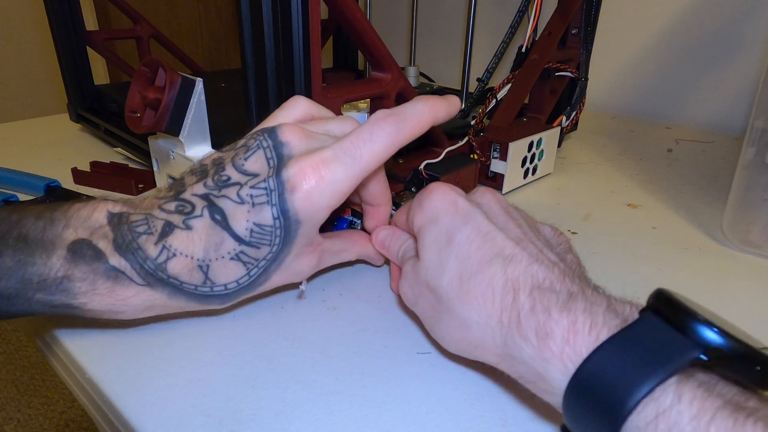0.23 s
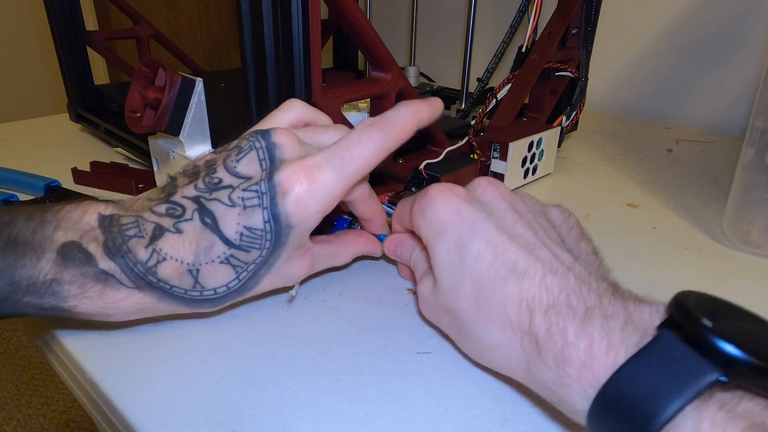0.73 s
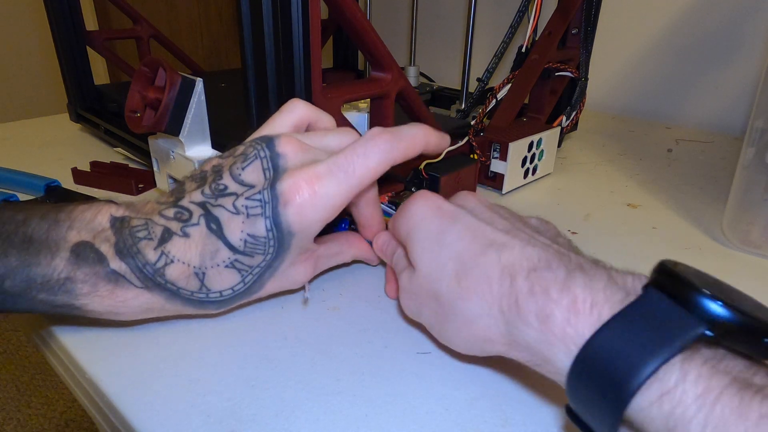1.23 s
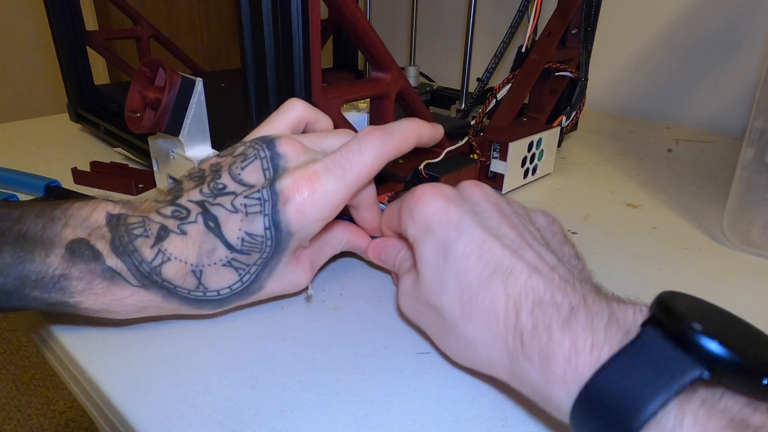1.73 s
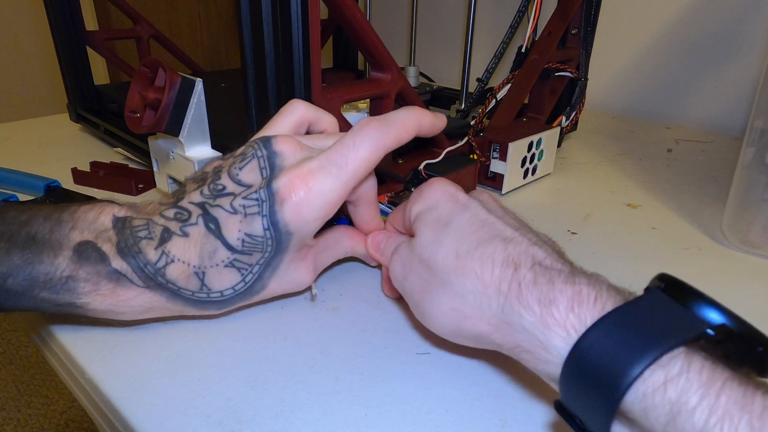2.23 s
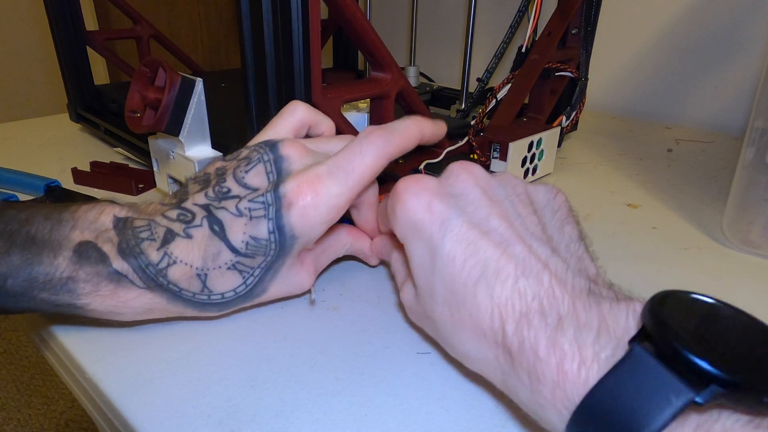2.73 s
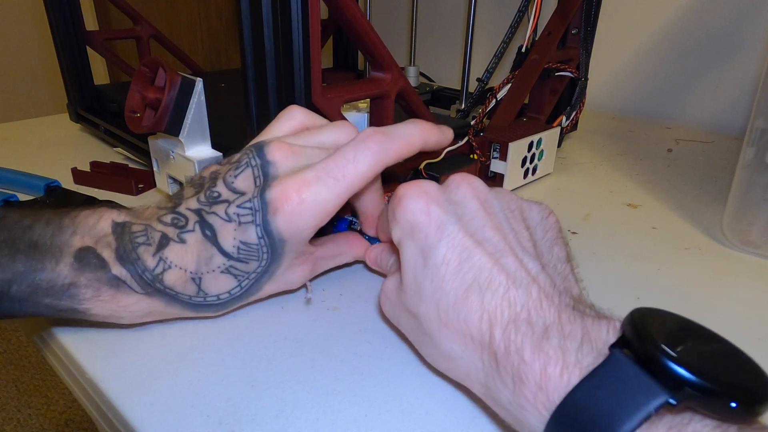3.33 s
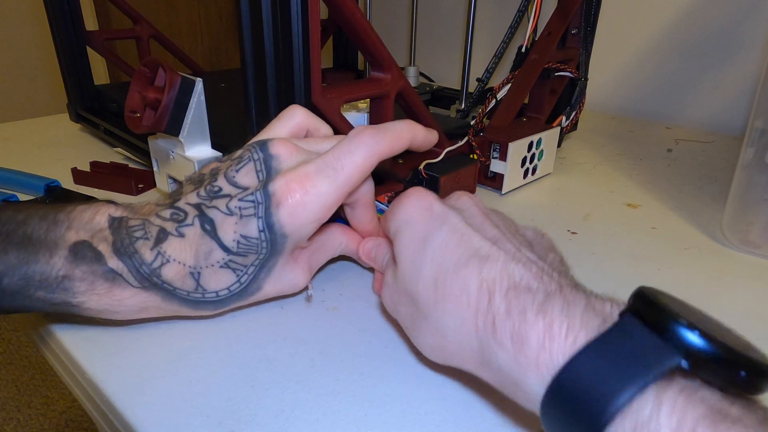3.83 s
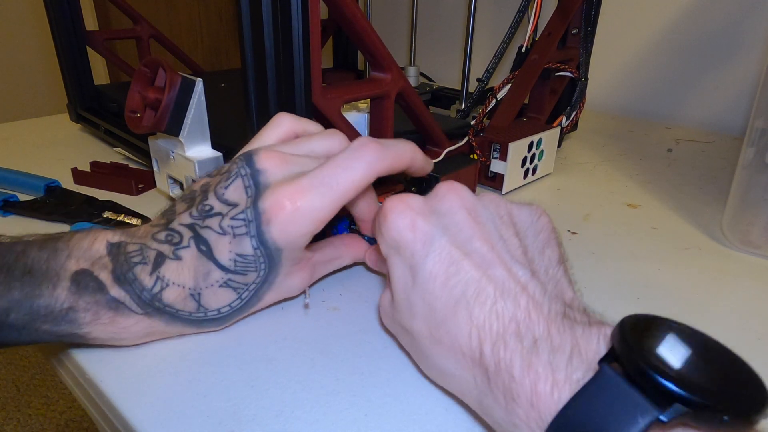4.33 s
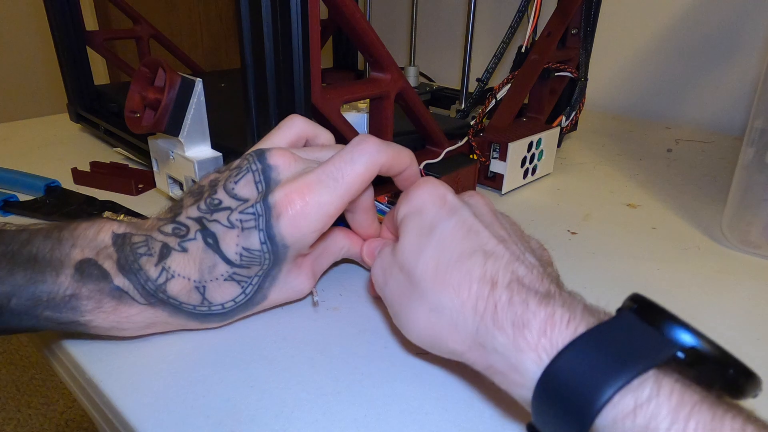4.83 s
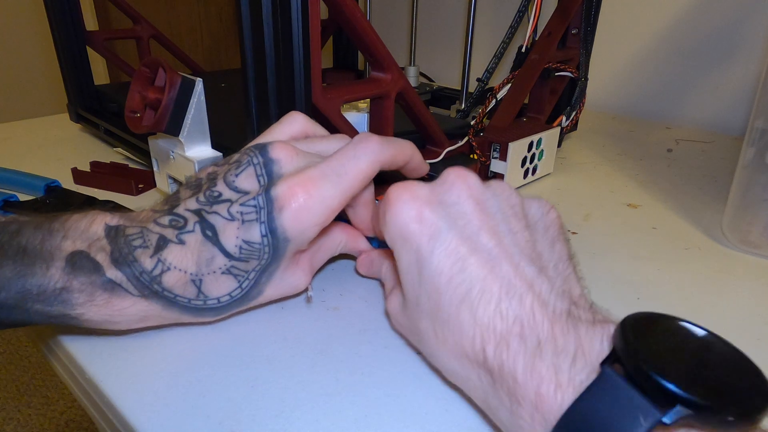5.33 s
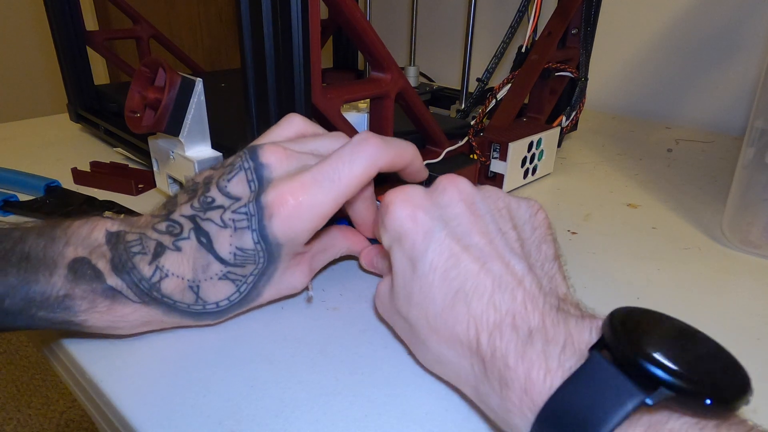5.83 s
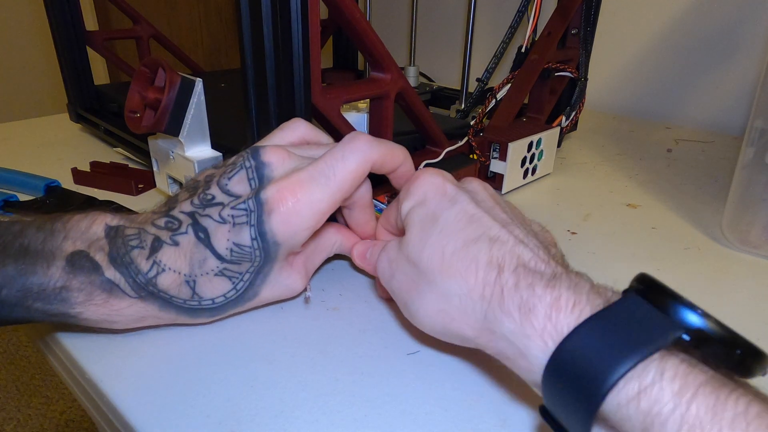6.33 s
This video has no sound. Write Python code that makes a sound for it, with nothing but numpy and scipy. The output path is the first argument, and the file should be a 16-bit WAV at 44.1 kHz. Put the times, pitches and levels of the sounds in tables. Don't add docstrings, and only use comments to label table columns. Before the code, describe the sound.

Two hands work a small plastic part and wires on a bench in a small hard room. Low knocks and dragging rumbles come through the microphone's stand, with grainy rustle and dry plastic ticks. A loud snap comes early, an even louder one near the middle, then quieter fiddling and soft bumps over faint hum and hiss.

```python
import sys
import numpy as np
from scipy import signal
from scipy.fft import rfft, irfft, next_fast_len
from scipy.io import wavfile
from scipy.ndimage import map_coordinates

SR = 44100
rng = np.random.default_rng(int(sys.argv[2]) if len(sys.argv) > 2 else 0)


def wrap_up_sound(samples):
    columns = np.atleast_2d(samples).T
    tamed = np.clip(columns, -1, 1)
    steps = np.round(tamed * 32767).astype(np.int16)
    wavfile.write(sys.argv[1], SR, steps)


def decibels_to_gain(level_db):
    exponent = np.asarray(level_db, float) / 20
    return 10 ** exponent


N = 289957


def board():
    # peak_s, level_db, rise_s, fall_s, hardness_db
    drags = [(.144, -42, 0.07, 0.033, 13.5), (.224, -42, 0.16, 0.093, 6), (.454, -42.5, 0.1, 0.34, -5),
             (.968, -35, 0.21, 0.11, -9.5), (1.114, -45.5, 0.053, 0.11, -6), (1.262, -51, .4, .05, -24),
             (1.456, -41.5, 0.24, 0.038, 2), (1.996, -31, 0.19, 0.033, -9), (2.034, -42, .2, 0.14, -16),
             (3.56, -44, 0.1, 0.32, -2.5), (3.714, -36.5, 0.24, 0.11, -9), (3.962, -50.5, 0.11, 0.17, 4.5),
             (4.022, -41.5, 0.3, .1, -21), (4.78, -33, 0.26, 0.15, -10), (5.228, -39.5, 0.067, 0.1, 5),
             (5.91, -35, 0.076, 0.13, -12.5), (6.108, -39, 0.21, 0.17, -6.5),
             (6.418, -44.5, 0.9, 0.095, -13.5), (1.79, -45, 0.046, 0.87, -21),
             (2.522, -40, 0.019, .125, -3), (3.068, -43.5, 0.038, 0.054, -24),
             (4.408, -56.5, 0.041, 0.37, -25), (5.322, -57.5, 0.053, 0.13, -17),
             (5.51, -37.5, .04, 0.11, -6.5)]
    # start_s, level_db, fall_s, hardness_db
    landings = [(1.291, -37, 0.22, -4), (2.287, -40, .11, -37), (2.485, -49.5, 0.093, -15),
                (2.874, -49.5, 0.15, 13.5), (3.211, -55, 0.62, -8.5), (3.48, -48.5, 0.36, -21),
                (4.905, -50.5, 0.038, -25), (5.06, -63.5, 0.064, -30), (5.138, -43, 0.45, -1.5),
                (5.761, -45, 0.075, -24), (5.821, -45.5, .5, -30)]
    # start_s, peak_db, hardness_db
    knocks = [(0.144, -19, -14), (0.377, -33, -24), (0.947, -19, -9.5), (0.974, -23, 6.5),
              (1.101, -25.5, -7.5), (1.284, -14, -9), (1.383, -28, -12), (1.962, -20, -21.5),
              (2.281, -23, -38), (2.485, -37, -16.5), (2.523, -28.5, -9), (3.053, -60, -34.5),
              (3.474, -35, -36), (3.634, -41, -19.5), (3.699, -27, -16), (3.878, -35.5, -11),
              (3.947, -26, -2), (3.994, -26.5, -10), (4.459, -34.5, -47), (4.744, -29, -25.5),
              (4.799, -53, -27), (5.047, -41.5, -34.5), (5.134, -23, -21), (5.318, -26.5, -30),
              (5.502, -32, -1.5), (5.76, -37, -26), (5.819, -25.5, -36.5), (6.087, -47, -31),
              (6.094, -19.5, -37), (6.351, -42.5, -17.5)]
    # pitch_hz, width_hz, level_db
    low_modes = [(182, 24, -3), (233, 35, -5), (287, 23.8, 1), (366.5, 40, -5.5), (427.5, 55, -10)]
    # pitch_hz, width_hz, level_db
    high_modes = [(498, 170, -1), (647, 44, 3), (647, 76, -4.5), (789, 79, 3), (960, 400, -6.5)]
    # pitch_hz, width_hz, level_db
    leg_modes = [(60, 29, -1.5), (101.1, 54, 3)]

    level, firm = strokes(drags, landings, attack_s=0.0032)
    push = decibels_to_gain(1.9 * wobble(30)) * slips(rate=250, spread_db=2.93, smooth=0.96)
    heavy = decibels_to_gain(-15.5) * level * (level / level.max()) ** 0.43
    drag = level * unit(body(push, low_modes))
    drag += heavy * unit(body(push, leg_modes))
    drag += firm * decibels_to_gain(-2.5) * unit(body(push, high_modes))

    soft, hard = np.zeros((2, N))
    for start_s, peak_db, hard_db in knocks:
        i = round(start_s * SR)
        soft[i] = -decibels_to_gain(peak_db + 35)
        hard[i] = -decibels_to_gain(peak_db + hard_db + 28.5)

    def stand(f):
        return (1j * f / (60 + 1j * f)) ** 2 / (1 + 1j * f / 1300) ** 2

    return filtered(decibels_to_gain(-2.5) * drag + body(soft, low_modes) + body(hard, high_modes), stand)


def plastic_contacts():
    # start_s, peak_db, ring_hz, edge_db
    taps = [(0.0667, -52, 1950, 24), (0.1052, -25.5, 1900, -17), (0.8506, -42.5, 1620, -24.5),
            (0.9104, -42.5, 2250, -14.5), (0.9465, -30.5, 1754, -11), (0.9586, -34, 2940, -17),
            (0.9746, -24.5, 1850, -14), (1.1038, -44, 1440, -8), (2.4857, -56.5, 3620, -6.5),
            (3.7956, -47, 1560, -30), (5.137, -39.5, 1400, -24)]
    # start_s, peak_db, ring_hz, edge_db
    held_ticks = [(0.481, -25, 3800, -39), (0.552, -29, 1830, -6), (1.171, -43.5, 1720, -17),
                  (1.19, -52, 1800, -19), (1.2311, -46.5, 3340, -15), (1.408, -45, 3450, -13),
                  (4.745, -48, 1184, -27), (6.088, -47, 1500, -3.5), (1.9418, -32.5, 2370, -37),
                  (2.285, -37, 3250, -14), (3.1652, -38, 1846, -51), (3.223, -36, 3380, -33),
                  (3.999, -32.5, 1800, -10), (4.287, -36, 1870, -16), (5.2819, -33.5, 1790, -15),
                  (5.5068, -32.5, 2920, -23), (5.638, -36.5, 2800, -23.5), (5.768, -50.5, 1640, -24)]
    # start_s, peak_db, ring_hz, edge_db, thud_db
    snaps = [
        (0.1255, -19.5, 1930, -11, -12),
        (0.1436, -15.5, 1900, -18, -11.5),
        (.4990, -18, 2300, -28, -20),
        (0.5244, -3.5, 2117, -10.5, -25.5),
        (1.2853, -28, 3470, -10.5, -16),
        (2.8678, 1, 2440, -8.5, -35.5),
    ]
    # pitch_hz, width_hz, level_db
    deep_modes = [(778, 170, -5), (1150, 360, 4.5)]
    # pitch_hz, width_hz, level_db
    low_modes = [(1560, 60, -0.5), (1800, 120, -1), (2276, 230, -5), (3050, 460, -6.5)]
    # pitch_hz, width_hz, level_db
    high_modes = [(4020, 610, -0.5), (4600, 160, -2.5), (5240, 520, -5.5)]
    # pitch_hz, width_hz, level_db
    tab_modes = [(6500, 780, -10.5), (7740, 690, -9.5), (9800, 1200, -8.5), (12800, 940, -10)]
    pulse, lead, knots = 4096, 48, 40

    out = np.zeros(N + SR)
    f = np.fft.rfftfreq(pulse, 1 / SR)
    small = 1 / (1 + (1400 / (f + 1)) ** 8)
    blunt = 1 / (1 + (f / 3300) ** 5)
    thud_range = 1 / (1 + (f / 1500) ** 4) / (1 + (600 / (f + 1)) ** 4)

    def ring(modes):
        return sum(decibels_to_gain(db + rng.normal(0, 0.5)) ** 2 / (1 + (2 * (f - hz) / width) ** 2)
                   for hz, width, db in modes)

    contacts = [(*row, -6.5) for row in taps] + [(*row, -25) for row in held_ticks] + snaps
    for start_s, peak_db, ring_hz, edge_db, thud_db in contacts:
        tone = blunt * ring(low_modes)
        tone += ring([(ring_hz, 350, -1.5)]) / (1 + ((f - ring_hz) / 900) ** 4)
        edge = decibels_to_gain(edge_db + 3.0) ** 2 * ring(high_modes) / (1 + (f / 6000) ** 8)
        tabs = decibels_to_gain(edge_db - 16.5 + 4.5) ** 2 * ring(tab_modes)
        overtone = decibels_to_gain(edge_db + 3) ** 2 / (1 + ((f - 2.03 * ring_hz) / 350) ** 4)
        overtone = overtone / (1 + (f / 5600) ** 16)
        thud = decibels_to_gain(thud_db + 7) ** 2 * ring(deep_modes) * thud_range
        knot_hz = np.arange(knots) * SR / 2 / knots
        late_s = 0.0045 * np.interp(f, knot_hz, rng.random(knots) ** 2) + lead / SR
        hit = causal(small * (tone + edge + tabs + overtone) + thud, late_s)
        hit = hit[:pulse // 2] / np.linalg.norm(hit)
        out[round(start_s * SR) - lead:][:len(hit)] += decibels_to_gain(peak_db + 11.5) * hit
    return out[:N]


def rustle():
    # peak_s, level_db, rise_s, fall_s, case_share_db
    rubs = [(.095, -64, .4, .02, -5), (.128, -43, 0.022, 0.028, 1), (.206, -59, .3, .09, -1),
            (.49, -42.5, 0.066, .01, -0.5), (.852, -49.5, 0.067, 0.14, -12), (.945, -51, 0.094, .01, -5),
            (1.419, -44.5, 0.048, 0.083, 3.5), (1.773, -58.5, .05, 0.19, -2.5),
            (1.945, -53, 0.11, 0.22, 1.5), (2.538, -50, 0.042, 0.15, 3), (3.578, -52, 0.12, 0.072, -4),
            (3.65, -54, 0.046, 0.25, -0.5), (3.986, -43.5, 0.089, 0.055, 1), (4.81, -57, 0.53, 0.14, -2),
            (5.2, -50.5, 0.083, 0.18, 0), (5.514, -55, 0.056, 0.062, -7.5), (5.65, -55.5, 0.13, 0.091, -1),
            (5.924, -54.5, 0.16, .18, -8), (6.112, -59, .22, 0.18, 4), (6.4, -71.5, 0.48, 0.13, 2.5),
            (2.862, -40, .02, .006, 8.5), (3.6, -67, 0.094, .3, 7.5), (5.24, -57.5, 0.092, 0.12, 8)]
    # start_s, level_db, fall_s, case_share_db
    catches = [(.002, -59, 0.027, -4), (.107, -45.5, 0.068, -3), (0.458, -40, 0.066, -3.5),
               (.988, -54, 0.033, -4), (1.1, -61.5, 0.38, -1), (1.296, -53.5, 0.069, 11.5),
               (2.292, -55.5, 0.13, 2.5), (2.57, -44, 0.041, -1), (3.4, -70.5, .07, -20.5),
               (3.799, -47.5, 0.05, -20), (4.289, -56.5, 0.076, -10), (5.142, -53, 0.18, -16),
               (5.287, -40.5, 0.05, -10)]
    # pitch_hz, width_hz, level_db
    hollow_modes = [(1400, 180, 1.5), (1800, 390, 1.5), (2300, 940, -6)]
    # pitch_hz, width_hz, level_db
    shell_modes = [(2840, 83, -5.5), (3504, 340, -1)]
    # pitch_hz, width_hz, level_db
    hiss_modes = [(5030, 750, -0.5), (6350, 1800, -11.5), (9000, 5400, -21.5)]

    grains = decibels_to_gain(2.2 * wobble(40)) * slips(rate=1900, spread_db=2.5, smooth=0.9)
    dull = unit(body(grains, hollow_modes))
    case = unit(body(grains, shell_modes))
    hiss = unit(body(grains, hiss_modes))
    level, open_hand = strokes(rubs, catches, attack_s=0.005)
    return decibels_to_gain(-5) * (level * dull + open_hand * (case + decibels_to_gain(-7.5) * hiss))


def room(x):
    # pitch_hz, time_s
    decay = [(200, 0.44), (800, 0.38), (2000, 0.35), (5500, 0.39), (10000, 0.3)]
    # pitch_hz, level_db
    walls = [(300, -5.5), (1000, 0.5), (2000, -4.5), (5000, -7.5), (8000, 6), (12000, -9)]

    out = np.zeros(N + 2 * SR)
    step = SR // 4
    for start in range(0, N, step):
        hz, t, z = signal.stft(rng.standard_normal(SR // 2), SR, nperseg=128)
        wall_fade = decibels_to_gain(-60 * t / along(decay, hz)[:, None])
        clutter_fade = decibels_to_gain(0.5 - 60 * t / 0.042)
        colour = decibels_to_gain(along(walls, hz)[:, None])
        tail = signal.istft(z * (wall_fade + clutter_fade) * colour, SR, nperseg=128)[1]
        answer = signal.fftconvolve(x[start:start + step], tail / np.linalg.norm(tail))
        out[start + 60:][:len(answer)] += answer
    return out[:N]


def air():
    # pitch_hz, level_db (per Hz)
    tone_colour = [(15, -29.5), (25, -4.5), (75, -2.5), (118, -8.5), (250, -7), (927, -23), (1090, -17.5),
                   (1350, -12), (1630, -18.5), (1810, -14.5), (2010, -16), (2300, -16.5), (3260, -20),
                   (5570, -23), (15000, -32.5)]
    noise = filtered(rng.standard_normal(N), lambda hz: decibels_to_gain(along(tone_colour, hz)))
    return decibels_to_gain(-67 + 0.77 * wobble(3.6)) * unit(noise)


def strokes(swells, sudden, attack_s):
    rows = swells + [(s, db, attack_s, fall, share) for s, db, fall, share in sudden]
    peak_s, level_db, rise_s, fall_s, share_db = np.transpose(rows)[..., None]
    t = np.arange(0, N, 32) / SR
    away = np.maximum((peak_s - t) / np.abs(rise_s), (t - peak_s) / np.abs(fall_s))
    power = decibels_to_gain(level_db - 24.5 * away) ** 2
    shared = power * decibels_to_gain(share_db) ** 2
    return [np.interp(np.arange(N) / SR, t, np.sqrt(p.sum(axis=0))) for p in (power, shared)]


def slips(rate, spread_db, smooth):
    hit = rng.random(N) < rate / SR
    size = decibels_to_gain(spread_db * np.minimum(rng.exponential(size=N), 2)) * rng.choice([-1, 1], N)
    return unit(hit * size) + smooth * rng.standard_normal(N)


def body(x, modes):
    def response(f):
        total = 0
        for k, (hz, width, db) in enumerate(modes):
            damping = 1j * f * width
            total = total + (-1) ** k * decibels_to_gain(db) * damping / (hz * hz - f * f + damping)
        return total

    return filtered(x, response)


def causal(power, delay):
    cepstrum = irfft(np.log(power + 1e-14) / 2)
    half = len(cepstrum) // 2
    folded = np.concatenate([cepstrum[:1], 2 * cepstrum[1:half], 0 * cepstrum[half:]])
    lag = 2 * np.pi * np.cumsum(delay) * SR / len(cepstrum)
    return irfft(np.exp(rfft(folded) - 1j * lag))


def filtered(x, response):
    m = next_fast_len(N + SR // 2)
    return irfft(rfft(x, m) * response(np.fft.rfftfreq(m, 1 / SR)), m)[..., :N]


def wobble(rate):
    knots = rng.standard_normal(int(N * 300 / SR) + 4)
    return map_coordinates(knots, [np.arange(N) * min(rate, 300) / SR])


def along(points, hz):
    f, v = np.transpose(points)
    return np.interp(np.log(hz + 1), np.log(f + 1), v)


def unit(x):
    return x / np.sqrt(np.mean(x ** 2) + 1e-20)


def scene():
    wood, skin, plastic = board(), rustle(), plastic_contacts()
    wet = room(decibels_to_gain(1.0) * plastic + decibels_to_gain(-13.0) * skin + decibels_to_gain(-8.5) * wood)
    return (wood + skin + plastic + wet + air())[None]


def band_limit(x):
    return signal.sosfilt(signal.butter(12, 15140, fs=SR, output="sos"), x)


def record(dry):
    # pitch_hz, level_db
    mic_colour = [(30, -9), (100, 2.5), (6000, 0.5), (9000, -4.5), (12000, -8.5), (15000, -32)]
    rounded = dry / (1 + np.abs(dry / 0.65) ** 4) ** (1 / 4)
    mix = filtered(rounded, lambda hz: decibels_to_gain(along(mic_colour, hz)))
    return band_limit(mix)


dry = scene()
out = record(dry)
wrap_up_sound(out)
```